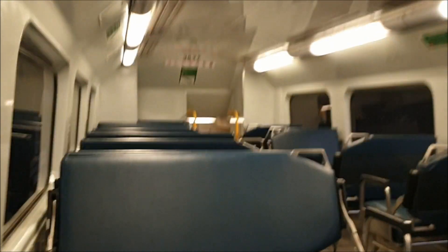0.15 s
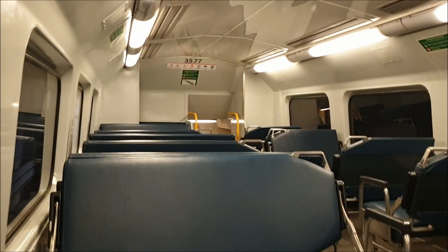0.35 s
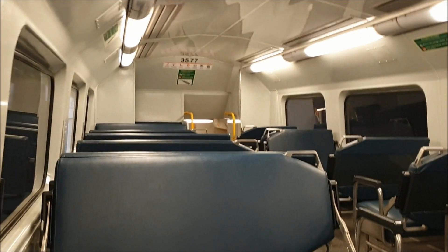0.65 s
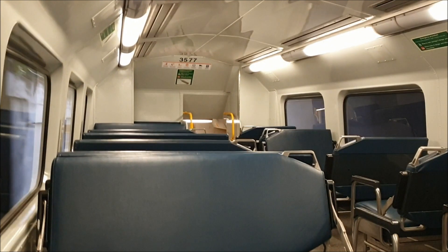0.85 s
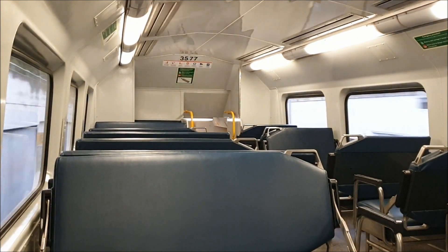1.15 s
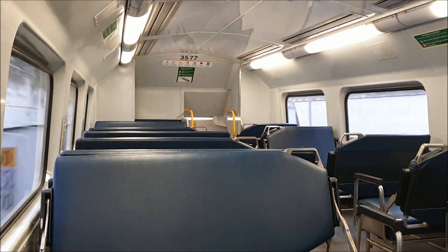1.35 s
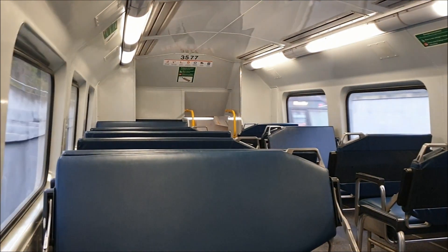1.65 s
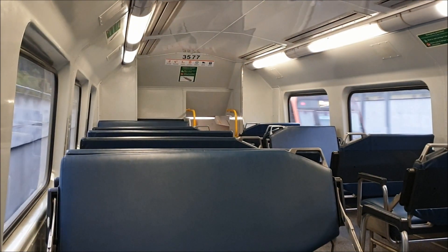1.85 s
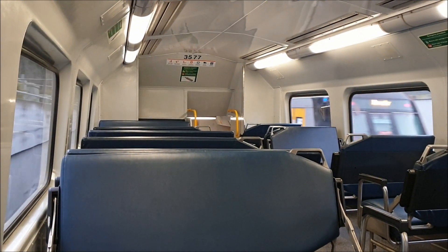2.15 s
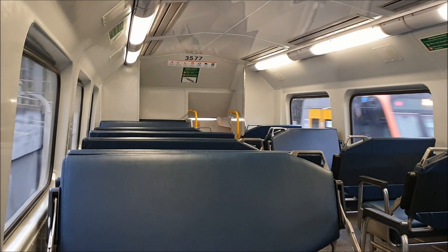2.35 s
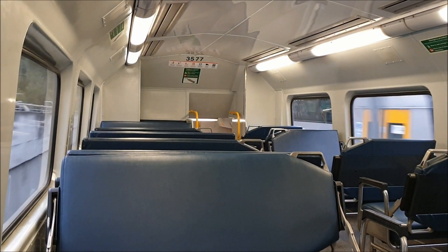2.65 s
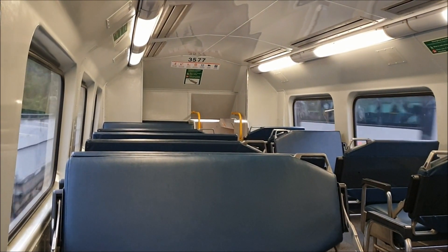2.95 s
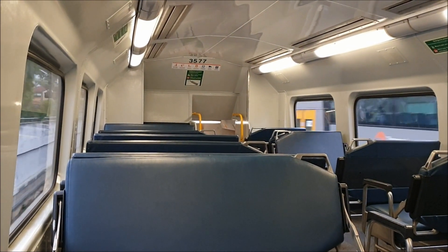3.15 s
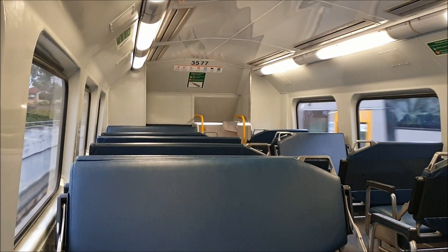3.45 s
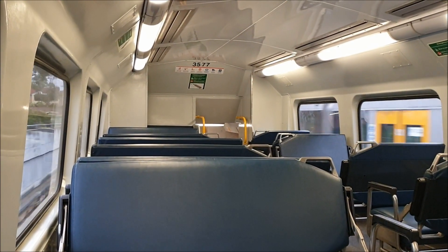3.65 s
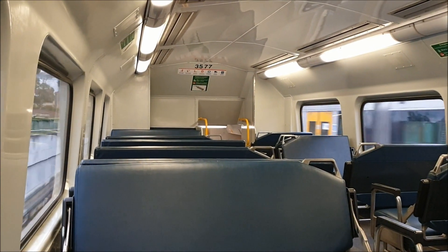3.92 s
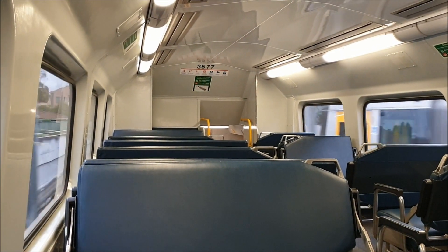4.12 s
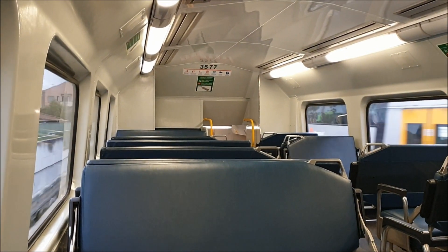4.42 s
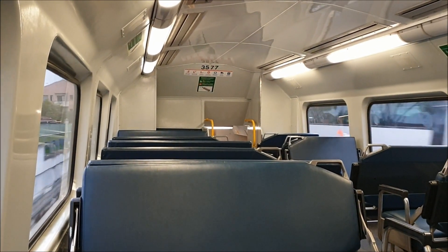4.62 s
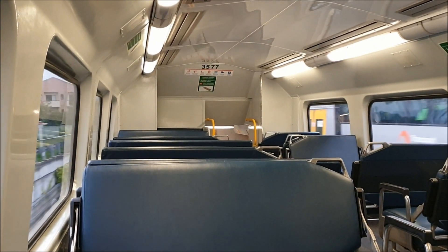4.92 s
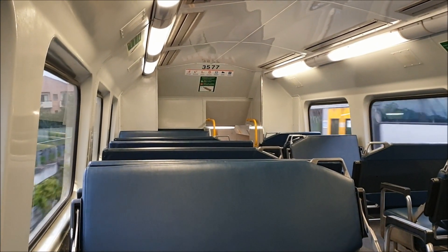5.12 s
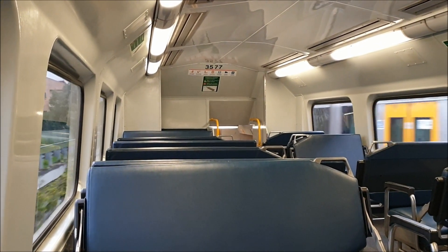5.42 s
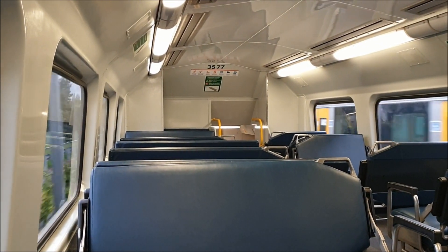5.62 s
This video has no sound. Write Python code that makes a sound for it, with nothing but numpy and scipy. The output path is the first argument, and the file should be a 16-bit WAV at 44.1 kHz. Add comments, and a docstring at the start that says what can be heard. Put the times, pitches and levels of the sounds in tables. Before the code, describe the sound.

A passenger train carriage rumbles steadily along the track, its machinery humming while the wheels faintly hiss and squeak on the rails.

```python
"""A rumbling floor and roaring wheels, heard inside an electric train at speed.
Rough rails shake the carriage; a throbbing machine hum and faint whines lie under the ventilation's rush.
Wall panels drone, and air swishes past at a tunnel mouth. Flanges brush the rail with a thin hiss
that rings up into faint high squeaks. Near the end the running gear knocks under the floor."""
import sys
import numpy as np
from scipy.fft import rfft, irfft, next_fast_len
from scipy.io import wavfile
from scipy.ndimage import uniform_filter1d, map_coordinates

SR = 44100
rng = np.random.default_rng(int(sys.argv[2]) if len(sys.argv) > 2 else 0)


def unload_audio(sound):
    """Save the sound as a 16-bit wav file, at the path given as the first command line argument."""
    columns = np.transpose(np.atleast_2d(sound))
    # keep every value between -1 and 1, then stretch to whole-number steps
    steps = np.round(np.clip(columns, -1, 1) * 32767)
    wavfile.write(sys.argv[1], SR, steps.astype(np.int16))


N = 254898

# cabin field, left-right likeness: freq_hz, correlation
CABIN_CORRELATION = [(60, .99), (150, .98), (290, .8), (460, .57), (600, .56), (850, .27), (1100, 0),
                     (1700, -.3), (2300, .1), (3400, -.1), (4700, .15), (5800, .55), (7200, .5), (8100, .2),
                     (9500, .52)]
# cabin field, left minus right: freq_hz, balance_db
CABIN_BALANCE = [(60, 1.7), (200, 2.7), (370, -.5), (620, 3), (1000, .8), (1500, .5), (2400, -1),
                 (4500, -5.4), (6300, 0), (8000, -2.2), (12000, -1.4)]
# rough and smooth track: centre_s, half_width_s, boom_change_db, rumble_change_db, roar_change_db
TRACK_JOLTS = [(0.045, 0.05, 1.5, 8, 0), (0.224, 0.12, 7, -1, 0), (0.39, 0.12, 2.5, 6, 0.5),
               (0.79, 0.069, -2, 0, 0.33), (1.03, 0.045, 4, 0.5, 1.5), (1.44, .05, -3, -1.5, 0.5),
               (1.62, .055, 3, 1.5, 0.8), (1.74, .04, -5, -0.5, -1.8), (1.872, 0.055, 0.5, 2.5, 1),
               (2.077, 0.11, -3, -2.5, 0.32), (2.276, 0.086, 4, -0.5, 1.8), (2.597, 0.052, -1, 3.5, 1),
               (2.92, .09, -4.5, -2.5, 0), (3.243, 0.06, 1, 2.5, 2), (3.45, .06, 3.5, -1, 0),
               (3.66, 0.063, -2.5, 3.5, .6), (3.898, .06, -1, -3.5, -1), (4.78, 0.15, 5.3, -1, 0.7),
               (5.26, .06, 2, 1, -1), (5.5, .07, 3, -1, -1.5), (5.68, 0.04, 0.5, 2, -2)]
# deep floor boom: freq_hz, relative_db
BOOM_SPECTRUM = [(12, -18), (29, -13), (40, 0.5), (49, 5.5), (58, 3.5), (67, 9), (79, 6.5), (95, -10),
                 (150, -51)]
# floor rumble: freq_hz, relative_db
RUMBLE_SPECTRUM = [(55, -37), (80, -4), (95, -4), (125, -2), (150, -4.5), (195, -9.5), (235, -15.5),
                   (400, -84)]
# rolling intensity, higher in the tunnel at the start: time_s, level_db
ROLLING_LEVEL = [(0, -32), (.8, -32.5), (1.22, -32), (1.75, -34), (2.25, -35.5), (2.7, -34.5), (3.25, -35),
                 (3.95, -34.5), (4.35, -33.5), (4.75, -34.5), (5.2, -34.5), (5.78, -34.5)]
# wheel roar: freq_hz, relative_db
ROAR_SPECTRUM = [(150, -23), (232, -4), (255, 1.5), (340, 0.5), (440, -2.5), (570, -8), (730, -8),
                 (850, -15.5), (1000, -11), (1250, -12), (1700, -19.5), (4000, -43.5)]
# ringing rails: freq_hz, relative_db
RAIL_SPECTRUM = [(550, -42), (720, -12), (810, 5.5), (900, 3), (980, -5.5), (1100, -7), (1500, -35)]
# rushing air: freq_hz, relative_db
AIR_SPECTRUM = [(600, -25), (1200, -6), (1600, -1.5), (2200, .9), (2800, -1.6), (3600, -5.1), (4800, -4.4),
                (6000, -11), (7000, -19), (9000, -32), (12000, -60)]
# hum sags and swells: centre_s, half_width_s, change_db
HUM_SWELLS = [(0.11, 0.09, -6.5), (.28, 0.045, 3), (0.477, 0.06, -8), (0.688, 0.023, -4), (1.16, 0.036, -5),
              (1.748, 0.06, 3.5), (2.03, 0.13, -1.5), (2.443, 0.11, -13), (2.82, 0.078, -3.5),
              (3.024, 0.098, -13), (3.27, 0.045, 3), (3.503, .05, -4), (3.9, 0.087, -2),
              (4.282, 0.039, -16), (4.45, 0.068, 2), (4.98, 0.44, 2), (5.5, 0.041, -15),
              (5.755, 0.075, -17)]
# motor whine swells: centre_s, half_width_s, lower_change_db, upper_change_db
MOTOR_SWELLS = [(1.1, 0.54, 8, 13), (3.2, 0.18, 6.5, 0), (4.35, 0.15, 6.5, 13.5), (4.68, 0.19, 12.5, 7),
                (4.77, .07, -1, 5), (5.03, 0.18, 4.5, -2)]
# fan and gear tones: pitch_hz, width_hz, relative_db
FAN_TONES = [(252, 11, -49.5), (306.3, 16, -43.5), (523, 13, -51.5), (603, 7.3, -49.5), (654, 11, -52.5),
             (880, 6, -53.5), (913, 5.5, -56), (1037, 6.4, -55), (1084, 5.6, -54.5), (1198, 6, -51)]
# a flange presses on the rail: start_s, attack_s, hold_s, rub_db, sizzle_db, fizz_db
FLANGE_CONTACTS = [(0, .1, .12, -55, -59, -62), (.3, .08, .03, -55, -57.5, -57),
                   (.95, .21, .04, -44.5, -48.7, -57), (2.56, .08, .02, -59, -58.5, -58),
                   (3.19, .03, .11, -48, -56, -50.5), (3.345, .11, .28, -47.5, -58.5, -60),
                   (3.64, .09, .16, -55, -55, -62), (3.96, .14, .09, -47, -48, -55),
                   (4.34, .12, .22, -49.5, -49.5, -58), (4.87, .09, .04, -55, -49, -56),
                   (5.01, .07, .04, -55, -49.5, -48.5), (5.63, .1, .08, -53, -56, -61)]
# dry flange rub: freq_hz, relative_db
RUB_SPECTRUM = [(3000, -20), (4500, -2), (6000, 3.5), (7300, 1), (9000, -1), (10100, 0), (12000, -9),
                (15700, -30)]
# sizzle around the high wheel modes: freq_hz, relative_db
SIZZLE_SPECTRUM = [(8000, -35), (9800, -14), (10700, -4), (11200, 0), (11800, -2), (12500, -11),
                   (14300, -25), (15700, -40)]
# fine flange fizz: freq_hz, relative_db
FIZZ_SPECTRUM = [(7000, -20), (10000, -4), (12800, 1), (14200, 0), (15000, -3), (15700, -13)]
# droning wall panels: centre_s, half_width_s, pitch_hz, width_hz, level_db
WALL_DRONES = [(1, .2, 610, 40, -44.5), (3.45, 0.44, 305, 16, -37)]
# a wheel rings up: start_s, peak_s, end_s, pitch_hz, width_hz, level_db
WHEEL_SQUEAKS = [(3.32, 3.52, 3.78, 9500, 320, -50), (3.4, 3.76, 4.6, 9500, 340, -54),
                 (3.92, 4.13, 4.45, 9500, 400, -56), (4.25, 4.47, 4.8, 9500, 400, -53.5),
                 (3.5, 3.88, 4.15, 11110, 260, -53), (3.92, 4.15, 4.45, 11110, 240, -47.5),
                 (4.28, 4.5, 4.72, 11110, 260, -50.5), (4.52, 4.7, 4.92, 11110, 240, -50.5),
                 (4.82, 5.08, 5.22, 11110, 240, -46), (5.1, 5.25, 5.75, 11110, 200, -54),
                 (5.0, 5.15, 5.54, 12720, 320, -50)]
# running gear knocks: start_s, level_db
GEAR_KNOCKS = [(5.42, -32), (5.582, -36), (5.721, -30.5)]
# struck floor panel: pitch_hz, width_hz, relative_db
FLOOR_MODES = [(420, 120, -1), (640, 120, 3), (815, 90, -1), (1040, 110, -3), (1210, 90, -4)]


def amp(db):
    """Decibels to gain."""
    return 10 ** (np.asarray(db) / 20)


def unit_rms(x):
    """Scale to rms 1."""
    return x / np.sqrt(np.mean(x ** 2) + 1e-20)


def log_interp(points, hz):
    """Read (freq_hz, value) points on a log axis."""
    freq_hz, values = np.transpose(points)
    return np.interp(np.log(hz + 1), np.log(freq_hz + 1), values)


def swell(centre_s, half_width_s):
    """Gaussian bump of height 1."""
    return np.exp(-((np.arange(N) / SR - centre_s) / half_width_s) ** 2)


def swells_db(rows):
    """Summed bumps, one curve per dB column."""
    return sum(np.outer(changes_db, swell(centre_s, half_s)) for centre_s, half_s, *changes_db in rows)


def wobble(rate_hz):
    """Smooth random curve with knots at rate_hz."""
    knots = rng.standard_normal(int(N * rate_hz / SR) + 4)
    return map_coordinates(knots, [np.arange(N) * rate_hz / SR])


def filtered(x, response):
    """Apply the gain response(hz) by FFT."""
    size = next_fast_len(N + 8192)
    return irfft(rfft(x, size) * response(np.fft.rfftfreq(size, 1 / SR)), size)[..., :N]


def resonance(hz, pitch_hz, width_hz):
    """Gain of one mode; full width at half gain."""
    return 1 / (1 + ((hz - pitch_hz) / (width_hz / 2)) ** 2)


def cabin_noise(response):
    """Diffuse stereo noise, mid rms 1; the sides are most alike in the bass."""
    def mid_side_gain(hz):
        correlation = np.clip(log_interp(CABIN_CORRELATION, hz), -.9, .999)
        side_gain = np.sqrt((1 - correlation) / (1 + correlation))
        return response(hz) * np.array([np.ones_like(hz), side_gain])
    mid, side = filtered(rng.standard_normal((2, N)), mid_side_gain)
    pair = np.array([mid + side, mid - side])
    pair = filtered(pair, lambda hz: amp(np.outer([.5, -.5], log_interp(CABIN_BALANCE, hz))))
    return pair / np.std(pair.mean(axis=0))


def shaped_noise(spectrum):
    """Cabin noise with a tabled spectrum."""
    return cabin_noise(lambda hz: amp(log_interp(spectrum, hz)))


def band_noise(pitch_hz, width_hz):
    """Cabin noise through one resonance."""
    return cabin_noise(lambda hz: resonance(hz, pitch_hz, width_hz))


def steadied(x, window_s):
    """Divide by the running rms of the mid signal."""
    power = np.abs(uniform_filter1d(x.mean(axis=0) ** 2, max(int(window_s * SR), 1)))
    return x / np.sqrt(power + 1e-6)


def tone(pitch_hz, balance_db, lead_rad):
    """Stereo sine; balance and lead are left minus right."""
    phase = 2 * np.pi * (np.cumsum(pitch_hz) / SR + rng.random())
    sides = np.array([[.5], [-.5]])
    return np.sqrt(2) * amp(sides * balance_db) * np.sin(phase + sides * lead_rad)


def floor_shake(spectrum, jolt_db, window_s):
    """Rail roughness shakes the floor unevenly."""
    level_db = -28.5 + jolt_db + 1.26 * wobble(11)
    return amp(level_db) * steadied(shaped_noise(spectrum), window_s)


def wheel_roar(rolling_db, jolt_db):
    """Wheels on rough rails roar through the walls."""
    level_db = -32.5 + .87 * rolling_db + jolt_db + .61 * wobble(14)
    return amp(level_db) * steadied(shaped_noise(ROAR_SPECTRUM), window_s=.31)


def rail_ring(rolling_db):
    """The rails ring under the wheels, with one hollow mode."""
    mode = steadied(band_noise(pitch_hz=828, width_hz=17), window_s=.2)
    return amp(-43 + 1.23 * rolling_db) * (shaped_noise(RAIL_SPECTRUM) + amp(-9.5) * mode)


def air_rush(rolling_db):
    """Air rushes past the carriage and from the vents."""
    return amp(-36.5 + .62 * rolling_db + .34 * wobble(15)) * shaped_noise(AIR_SPECTRUM)


def machine_hum(pitch_hz=168.1, throb_hz=4.11, throb_peak_s=.35):
    """Electric machinery hums; a slow beat makes it throb, vibration roughens it."""
    throb_db = np.cos(2 * np.pi * throb_hz * (np.arange(N) / SR - throb_peak_s))
    rough_db = wobble(45) + .7 * wobble(18)
    level_db = -27.5 + throb_db + swells_db(HUM_SWELLS)[0] + rough_db
    return amp(level_db) * tone(pitch_hz + .25 * wobble(6), balance_db=2.6, lead_rad=.08)


def motor_whine(lower_hz=764.5, upper_hz=819.5):
    """Two wavering motor notes sing out now and then."""
    lower_db, upper_db = swells_db(MOTOR_SWELLS)
    lower_gain = amp(-54.5 + lower_db + 1.1 * wobble(16))
    lower = tone(lower_hz + 1.5 * wobble(20), balance_db=10, lead_rad=.34)
    upper_gain = amp(-55.5 + upper_db + 1.1 * wobble(16))
    upper = tone(upper_hz + 2 * wobble(22), balance_db=-6, lead_rad=.4)
    return lower_gain * lower + upper_gain * upper


def fans():
    """Fans and gears give steady narrow tones."""
    def response(hz):
        return sum(amp(db) * resonance(hz, pitch_hz, width_hz) / np.sqrt(width_hz)
                   for pitch_hz, width_hz, db in FAN_TONES)
    return amp(-42.5) * steadied(cabin_noise(response), window_s=.18)


def flange_hiss(release_s=.26):
    """Steel rubs on steel; uneven contact makes rub, sizzle and fizz flutter together."""
    t = np.arange(N) / SR
    power = amp([[-50], [-61.5], [-63.5]]) ** 2  # light constant contact: rub, sizzle, fizz
    for start_s, attack_s, hold_s, *levels_db in FLANGE_CONTACTS:
        release = np.exp(-np.maximum(t - start_s - attack_s - hold_s, 0) / release_s)
        press = np.clip((t - start_s) / attack_s, 0, 1) * release
        power = power + np.outer(amp(levels_db), press) ** 2
    flutter_db = 1.3 * np.tanh(wobble(55)) + .83 * np.tanh(wobble(21))
    layers = zip(np.sqrt(power), [RUB_SPECTRUM, SIZZLE_SPECTRUM, FIZZ_SPECTRUM])
    return amp(flutter_db) * sum(gain * shaped_noise(spectrum) for gain, spectrum in layers)


def wall_drones():
    """The shaking body excites single panel modes, which swell and fade."""
    return sum(amp(db) * swell(centre_s, half_s) * steadied(band_noise(pitch_hz, width_hz), window_s=.15)
               for centre_s, half_s, pitch_hz, width_hz, db in WALL_DRONES)


def tunnel_swish():
    """Air sweeps along the windows at the tunnel mouth."""
    return amp(-44) * swell(centre_s=1.17, half_width_s=.12) * band_noise(pitch_hz=5950, width_hz=1800)


def wheel_squeaks(note_db=-7, waver_hz=45.5):
    """Friction feeds one wheel mode: a thin wavering note inside a narrow hiss."""
    t, out = np.arange(N) / SR, np.zeros((2, N))
    for start_s, peak_s, end_s, pitch_hz, width_hz, db in WHEEL_SQUEAKS:
        envelope = np.interp(t, [start_s, peak_s, end_s], [0, 1, 0])
        hiss = band_noise(pitch_hz, width_hz)
        note = amp(3 * wobble(60)) * tone(pitch_hz + waver_hz * wobble(120), balance_db=-1.4, lead_rad=0)
        out += amp(db) * envelope * unit_rms(hiss + amp(note_db) * unit_rms(note))
    return out


def gear_knocks(attack_s=.005, t60_s=.17):
    """Dull blows from the running gear ring the floor panel briefly."""
    def panel(hz):
        return sum(amp(db) * resonance(hz, pitch_hz, width_hz) for pitch_hz, width_hz, db in FLOOR_MODES)
    t, out = np.arange(N) / SR, np.zeros((2, N))
    for start_s, level_db in GEAR_KNOCKS:
        age_s = np.maximum(t - start_s, 0)
        envelope = amp(level_db - 60 * age_s / t60_s) * np.minimum(age_s / attack_s, 1)
        out += envelope * steadied(cabin_noise(panel), window_s=.02)
    return out


def scene():
    """Everything heard from a seat in the carriage."""
    time_s, level_db = np.transpose(ROLLING_LEVEL)
    rolling_db = np.interp(np.arange(N) / SR, time_s, level_db) + 34  # re -34 dB
    boom_db, rumble_db, roar_db = swells_db(TRACK_JOLTS)
    boom = floor_shake(BOOM_SPECTRUM, boom_db, window_s=.099)
    rumble = floor_shake(RUMBLE_SPECTRUM, rumble_db, window_s=.14)
    running = wheel_roar(rolling_db, roar_db) + rail_ring(rolling_db) + air_rush(rolling_db)
    bed = boom + rumble + running + machine_hum() + motor_whine() + fans()
    return bed + flange_hiss() + wall_drones() + tunnel_swish() + wheel_squeaks() + gear_knocks()


def record(dry):
    """Brick-wall low-pass at 15760 Hz."""
    return filtered(dry, lambda hz: hz < 15760)


dry = scene()
out = record(dry)
unload_audio(out)
```